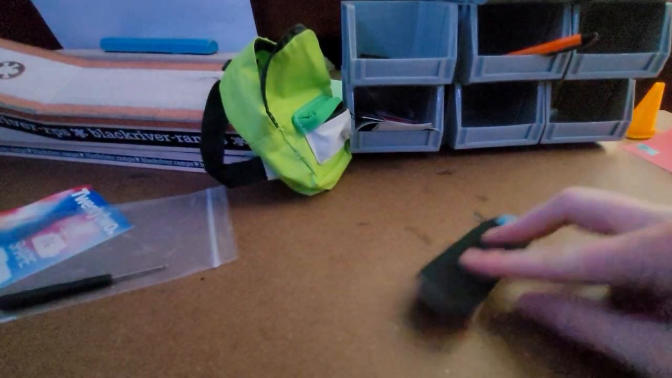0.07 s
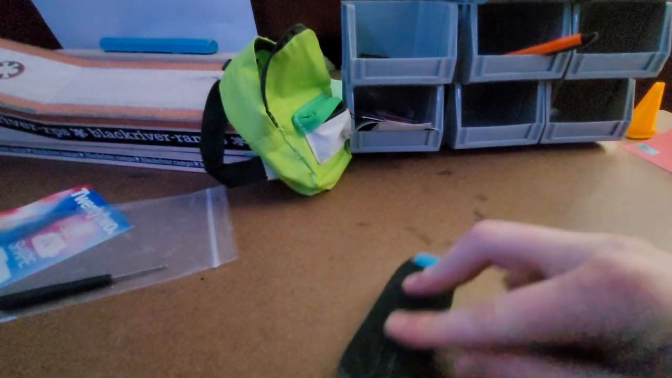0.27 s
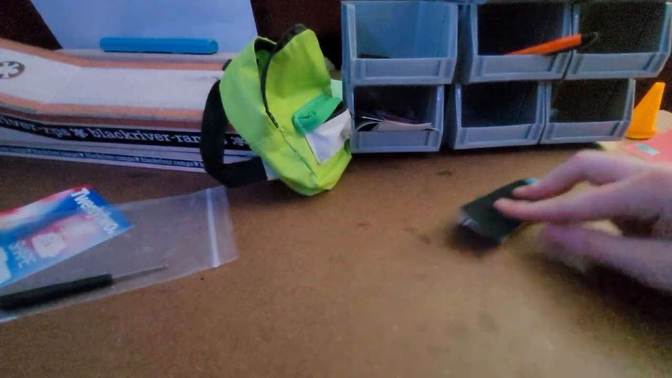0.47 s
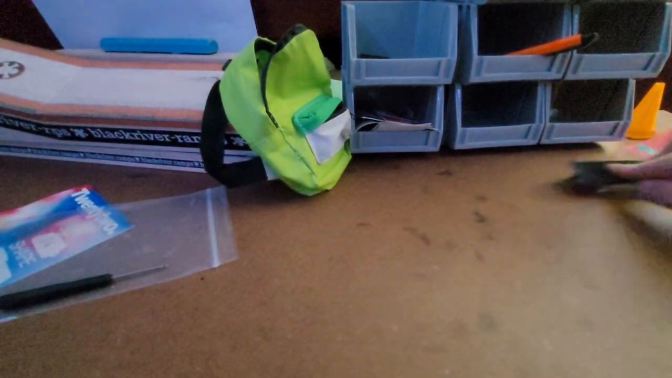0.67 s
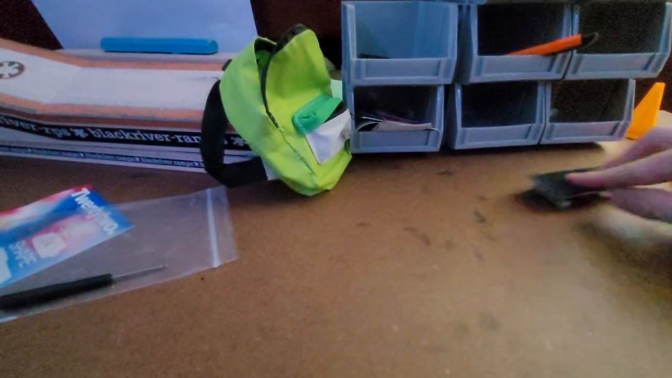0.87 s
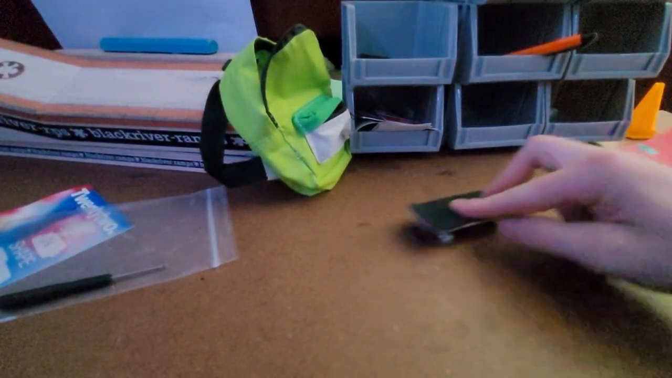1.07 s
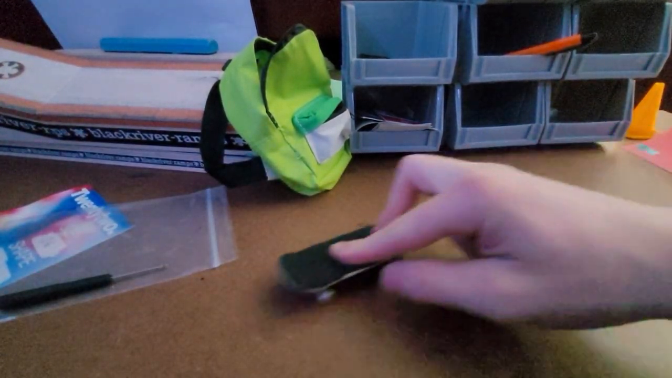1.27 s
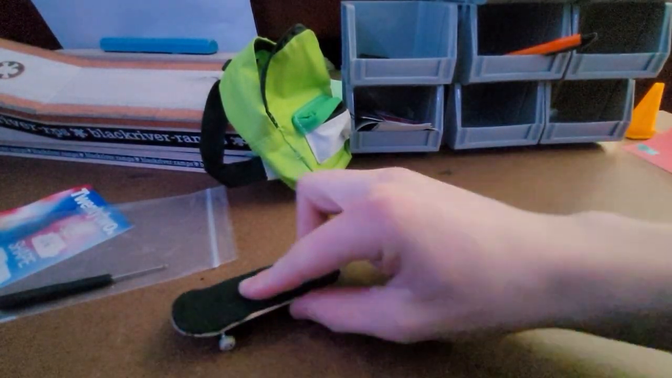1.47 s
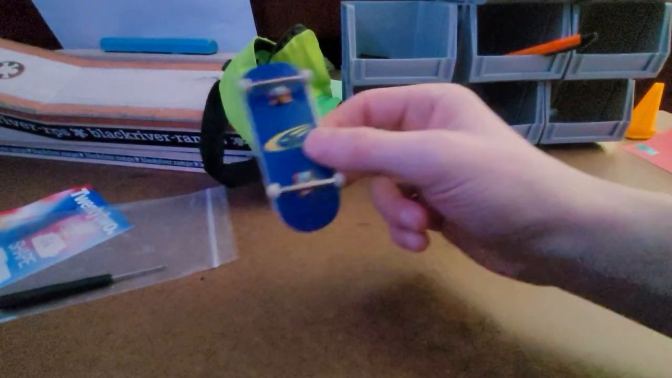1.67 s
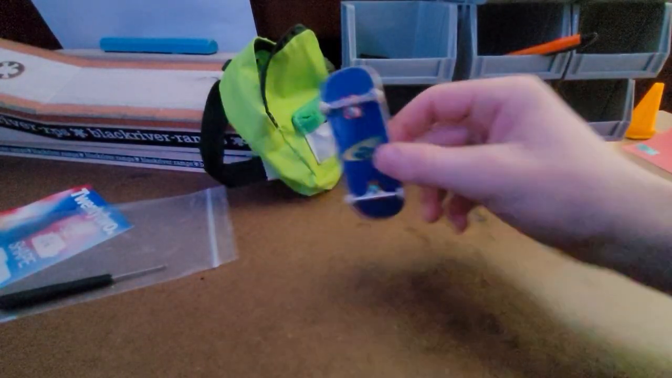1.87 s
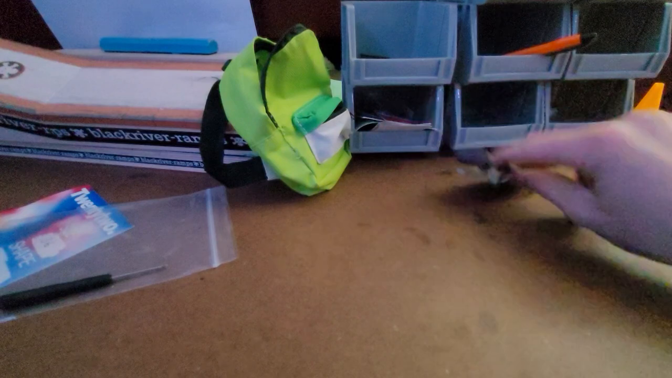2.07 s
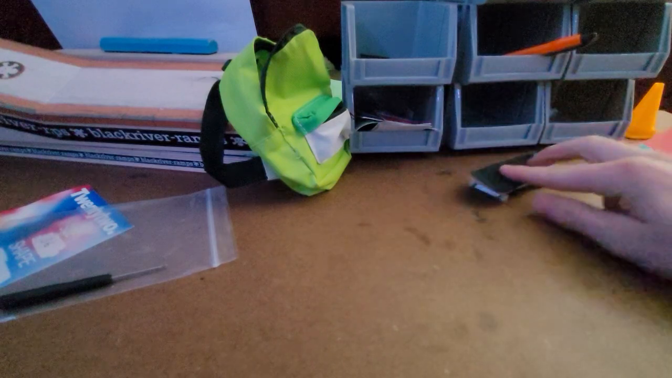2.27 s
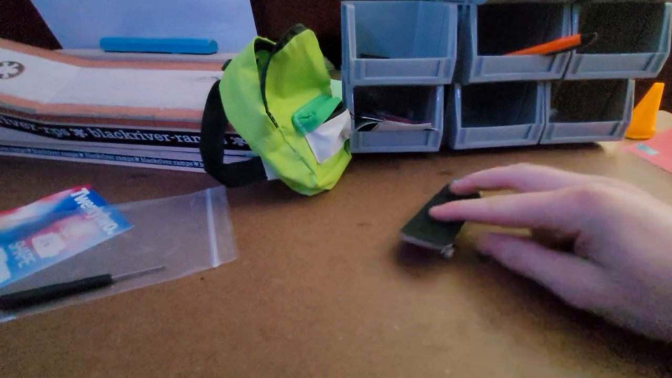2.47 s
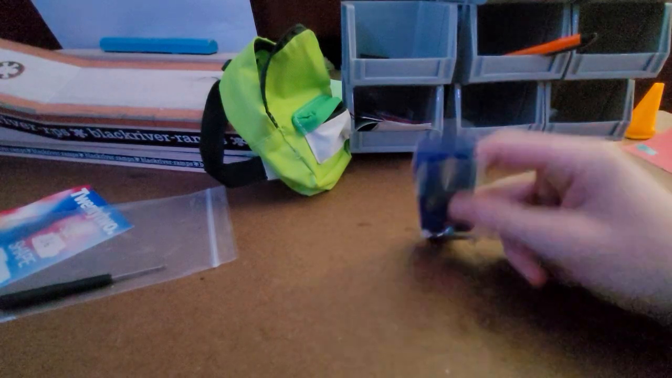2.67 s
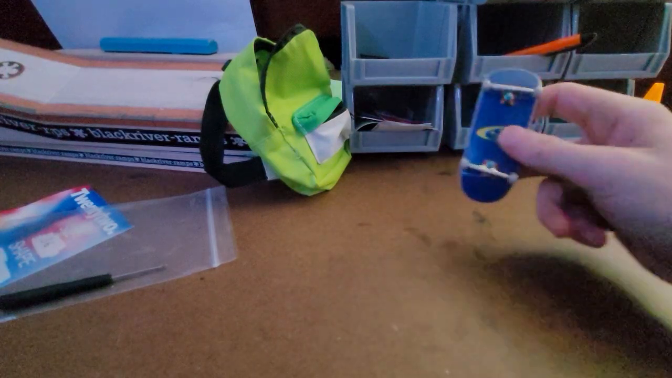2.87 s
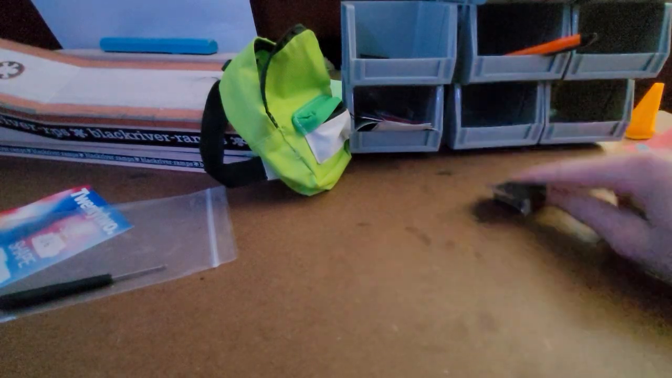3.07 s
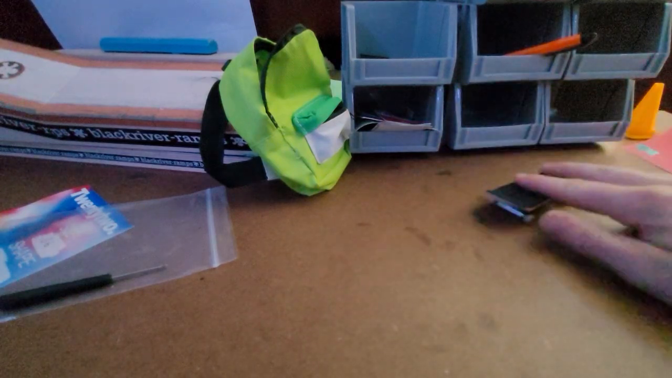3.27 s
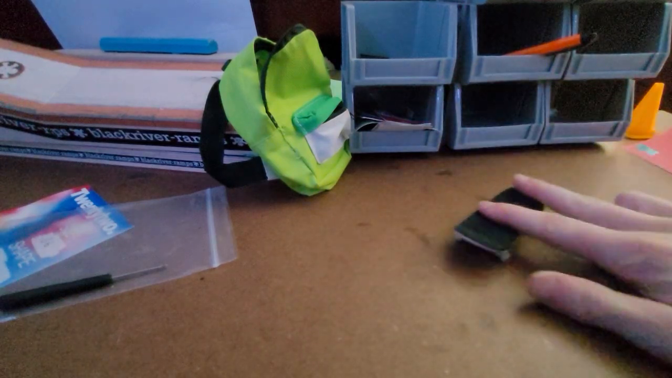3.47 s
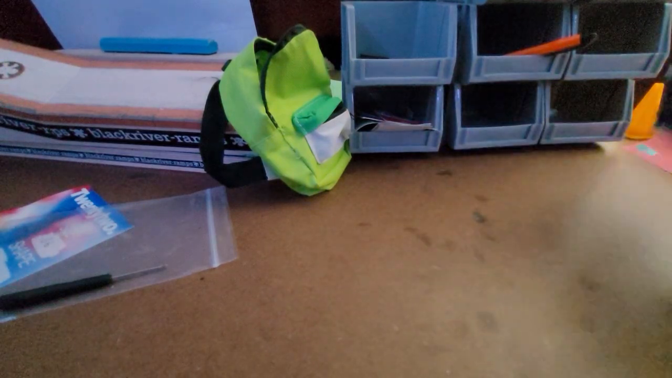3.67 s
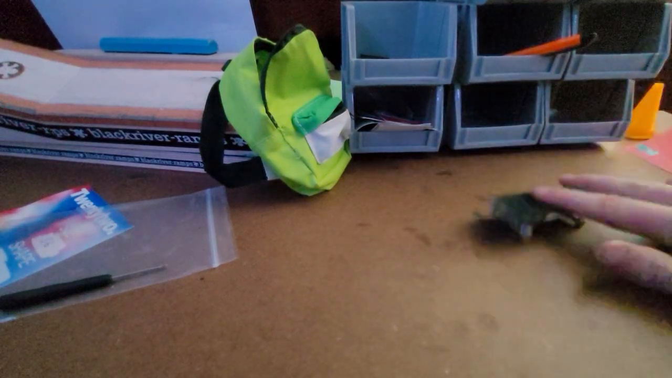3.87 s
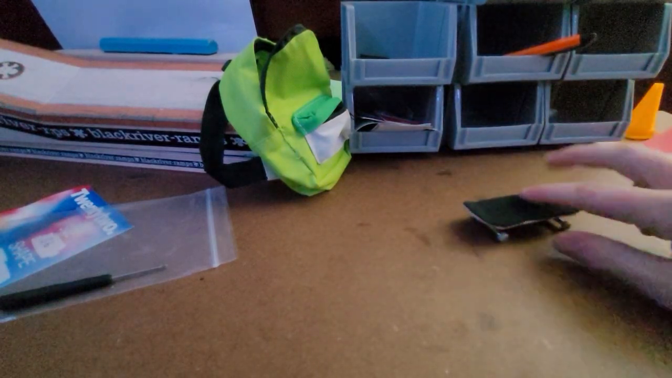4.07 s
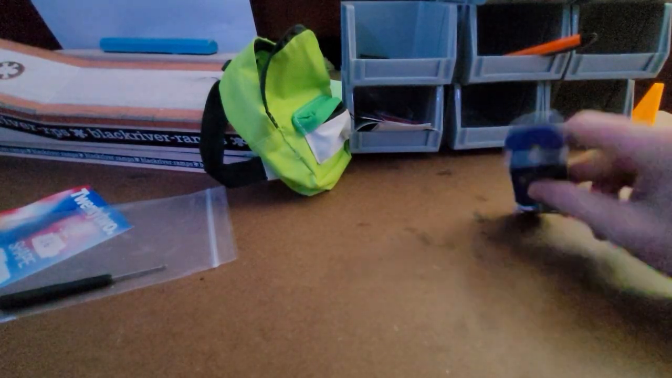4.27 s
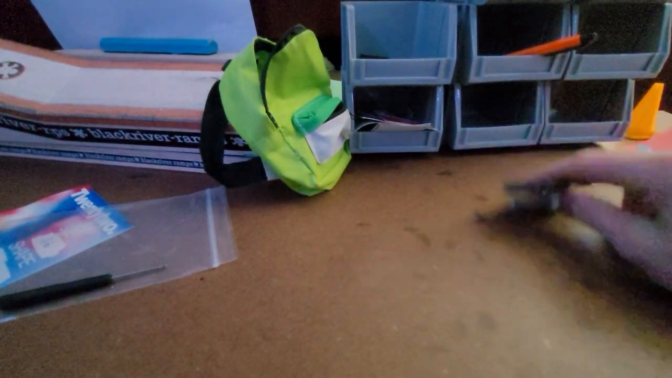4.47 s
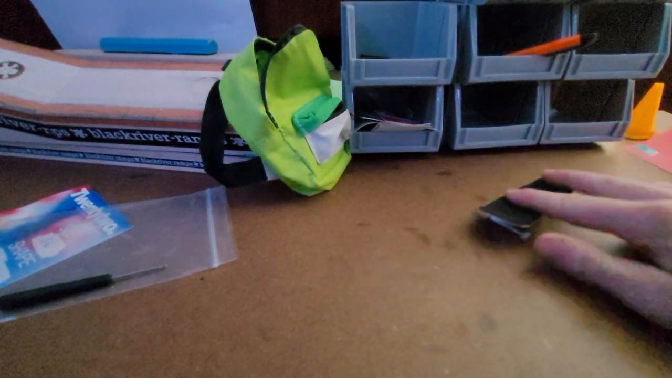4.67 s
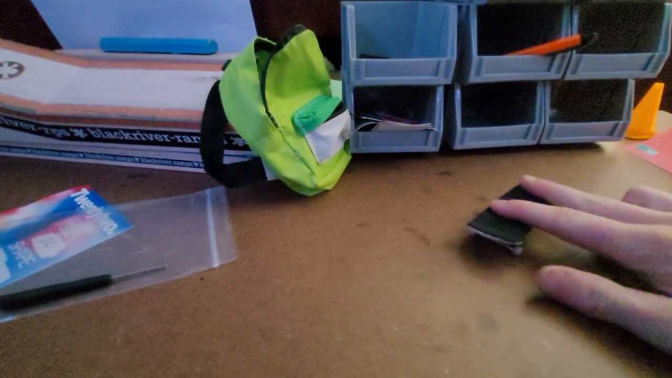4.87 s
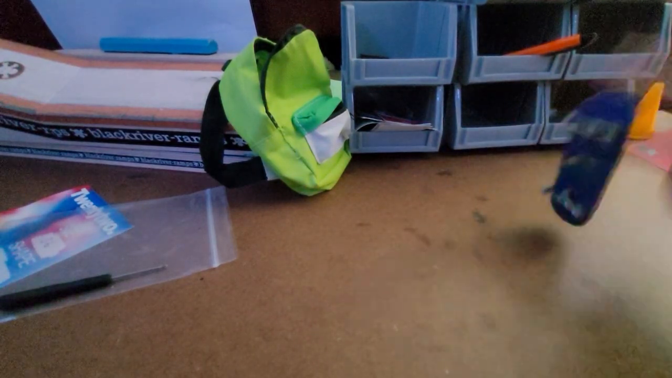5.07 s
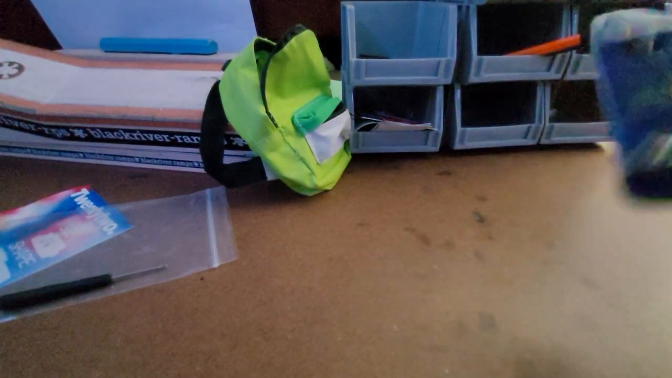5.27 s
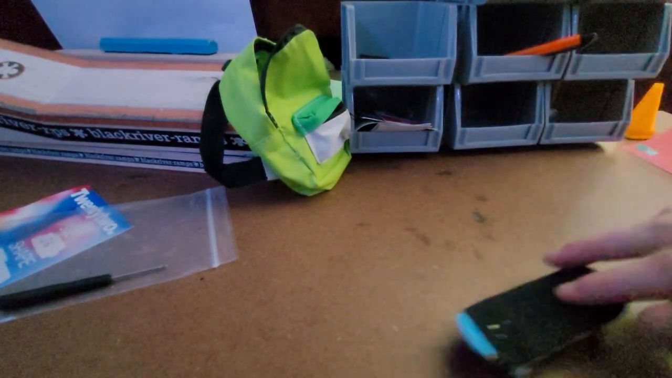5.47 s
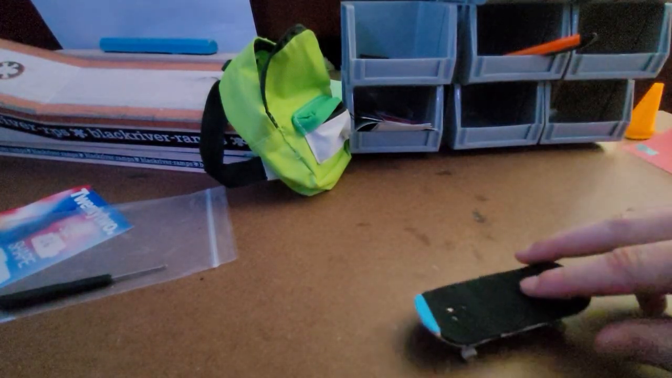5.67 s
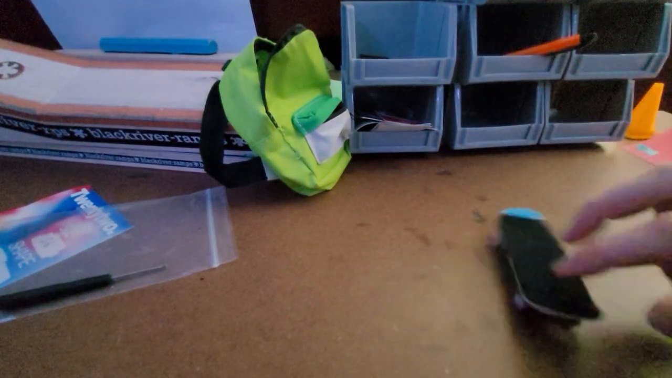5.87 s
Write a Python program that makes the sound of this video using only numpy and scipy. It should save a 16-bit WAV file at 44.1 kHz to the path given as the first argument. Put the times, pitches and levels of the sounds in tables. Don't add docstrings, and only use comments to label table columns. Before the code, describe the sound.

A toy skateboard scrapes back and forth on a desktop, its tail snapping and its wheels clattering down, with steady hum behind.

```python
import sys
import numpy as np
from scipy import signal
from scipy.fft import rfft, irfft, next_fast_len
from scipy.io import wavfile

SR = 44100
rng = np.random.default_rng(int(sys.argv[2]) if len(sys.argv) > 2 else 0)


def digitize_waveform(pressure):
    field = np.atleast_2d(pressure).T
    bounded = np.clip(field, -1, 1)
    quanta = np.round(bounded * 32767).astype(np.int16)
    wavfile.write(sys.argv[1], SR, quanta)


def ratio_of_db(decibels):
    return 10 ** (np.asarray(decibels, float) / 20)


N = 260229


def rms_one(x):
    return x / np.sqrt(np.mean(x ** 2) + 1e-20)


def at_hz(points, hz):
    table_hz, values = np.transpose(points)
    return np.interp(np.log(hz), np.log(table_hz), values)


def over_time(points):
    return np.interp(np.arange(N) / SR, *np.transpose(points))


def add_at(out, s, sound):
    out[..., round(s * SR):][..., :sound.shape[-1]] += sound


def drift(rate_hz):
    step = int(np.clip(SR / rate_hz / 64, 1, 64))
    r = np.exp(-2 * np.pi * rate_hz * step / SR)
    white = rng.standard_normal(N // step + 1002)
    slow = signal.lfilter([1], [1, -2 * r, r * r], white)[1000:]
    return np.interp(np.arange(N) / step, np.arange(len(slow)), rms_one(slow))


def resonate(x, hz, width_hz):
    r = np.exp(-np.pi * width_hz / SR)
    poles = [1, -2 * r * np.cos(2 * np.pi * hz / SR), r * r]
    return signal.lfilter([(1 - r * r) / 2, 0, (r * r - 1) / 2], poles, x)


def swell(t, start, end, rise_s, fall_s, order):
    outside = np.maximum((start - t) / rise_s, (t - end) / fall_s)
    return ratio_of_db(-20 * np.maximum(0, outside) ** order)


def fades(times, levels_db, t60, rise_s):
    out, t = np.zeros(N + SR), np.arange(SR // 5) / SR
    shape = ratio_of_db(-60 * t / t60) * (1 - np.exp(-t / rise_s))
    for s, db in zip(times, levels_db):
        add_at(out, s, ratio_of_db(db) * shape)
    return out[:N]


def pair(spectrum, likeness, balance):
    size = next_fast_len(N)
    hz = np.arange(size // 2 + 1) * SR / size + 1
    colour = ratio_of_db(at_hz(spectrum, hz)) * (hz < 15800)
    mid, side = rfft(rng.standard_normal((2, size))) * colour
    alike = np.clip(at_hz(likeness, hz), -.99, .99)
    lean = ratio_of_db(at_hz(balance, hz) / 2)
    mid, side = np.sqrt(1 + alike) * mid, np.sqrt(1 - alike) * side
    out = irfft([(mid + side) * lean, (mid - side) / lean], size)[:, :N]
    return out / np.std(out.mean(axis=0))


# (frequency [Hz], density [dB per Hz])
AIR_COLOUR = [(20, -25), (43, -17), (60, -14), (100, -13), (200, -14), (290, -13), (480, -18.5), (620, -23),
              (1400, -25), (2300, -26.5), (4500, -34.5), (8700, -46), (12500, -47), (15700, -48)]
# (frequency [Hz], left-right likeness [-1 to 1])
FAR_LIKENESS = [(60, 0.34), (180, 1), (550, 0.29), (1650, -0.19), (4970, -0.12), (15000, -0.164)]
# (frequency [Hz], left over right [dB])
FAR_BALANCE = [(60, 2.5), (8000, 0), (15000, 4)]
# (time [s], level [dB])
AIR_LEVEL = [(0, -47.5), (.4, -47), (1.5, -45), (2.1, -45.5), (3, -48.5), (5.9, -49)]
# (frequency [Hz], width [Hz], level [dB])
HUM = [(75.1, 2.1, -10.5), (152.7, 2.8, -4.5), (180.8, 1.06, -8.5), (289.3, 8.64, -9.5)]


def room_tone():
    mains_hz, mains_db, hum_db = 119.4, 0, 1.5
    common, own = rng.standard_normal((2, N))
    white = common + 0.17 * own * [[1], [-1]]
    hum = rms_one(sum(ratio_of_db(db) * rms_one(resonate(white, hz, width)) for hz, width, db in HUM))
    mains = np.sqrt(2) * np.sin(2 * np.pi * mains_hz * np.arange(N) / SR)
    mains = mains * ratio_of_db(mains_db + 0.77 * drift(2.701))
    air = pair(AIR_COLOUR, FAR_LIKENESS, FAR_BALANCE) * ratio_of_db(2.2 * drift(0.89))
    return ratio_of_db(over_time(AIR_LEVEL)) * (air + ratio_of_db(hum_db) * hum + mains)


# (frequency [Hz], left-right likeness [-1 to 1])
NEAR_LIKENESS = [(50, 0.4082), (200, 1), (700, 0.49), (1500, 0.102), (4000, 0.023), (12000, 0.036)]
# (frequency [Hz], left over right [dB])
NEAR_BALANCE = [(60, -1), (300, -3), (3000, 1.5), (6000, 0), (9000, 6.5), (15000, 11)]


def near(spectrum):
    return pair(spectrum, NEAR_LIKENESS, NEAR_BALANCE)


# (time [s], level [dB])
HAND_WEIGHT = [(0.0, -43), (1.0, -45), (1.26, -38), (1.85, -53), (2.15, -41.5), (2.89, -55.5), (3.22, -59),
               (3.48, -38.5), (3.79, -42), (4.03, -45), (4.37, -55.5), (4.78, -45.5), (4.93, -52),
               (5.42, -48), (5.9, -46)]
# (frequency [Hz], density [dB per Hz])
DRONE_COLOUR = [(40, -27.5), (70, 7), (150, -7), (270, 5), (330, -23.5), (430, 3), (560, -10.5), (800, -44)]


def drone():
    return ratio_of_db(over_time(HAND_WEIGHT) - 3.0 + 1.7 * drift(22.4)) * near(DRONE_COLOUR)


# (time [s], sway peak [dB], bounce over the sway [dB])
THUMPS = [(0.048, -38, -15), (0.344, -22.5, -4.5), (2.221, -33, 4), (2.249, -31, -1), (2.78, -25.5, -9),
          (3.221, -41, 6), (3.746, -30.5, 9.5), (3.963, -35, 10.5), (4.03, -42, 14), (4.246, -32, -5),
          (4.399, -42, 5), (4.619, -42.5, 7), (5.177, -30, 3), (5.486, -29, 9.5), (5.529, -30.5, -7.5),
          (5.603, -35, -1.5)]


def thumps():
    sway_hz, bounce_hz, t60 = 70.816, 136.4, 0.2
    out, t = np.zeros((2, N + SR)), np.arange(SR // 4) / SR
    lead = np.array([[-.6], [.6]])
    sagging_t = t + 0.005691 * (1 - np.exp(-t / 0.00684))
    sway = np.sin(2 * np.pi * sway_hz * sagging_t + lead) * ratio_of_db(-60 * t / t60)
    bounce = np.sin(2 * np.pi * bounce_hz * t + 0.64 * lead) * ratio_of_db(-60 * t / (0.72 * t60))
    for s, db, bounce_db in THUMPS:
        swings = sway + ratio_of_db(bounce_db) * bounce
        add_at(out, s, ratio_of_db(db + 3.5) * swings * (1 - np.exp(-t / 0.0031)))
    return out[:, :N] * ratio_of_db([[-2.2], [2.2]])


# (time [s], level [dB], frequency [Hz], length [s], width [Hz])
SQUEAKS = [(0.318, -36.5, 3800, 0.052, 400), (0.3, -40.5, 4600, 0.012, 400), (0.26, -38, 1700, 0.03, 400),
           (0.47, -38, 1300, 0.041, 530), (0.485, -35.5, 3260, 0.02, 980), (0.525, -40, 3400, 0.015, 500),
           (0.45, -45, 4300, 0.008, 500), (0.8, -46, 4200, 0.027, 1400), (0.92, -39, 2897, 0.018, 600),
           (0.96, -44, 4400, 0.025, 910), (1.319, -48, 1900, 0.095, 600), (2.47, -44.5, 980, 0.04, 260),
           (1.77, -50, 2200, 0.05, 600), (1.78, -51, 3100, 0.04, 600), (1.78, -58, 6500, 0.06, 1000),
           (3.205, -48, 1370, 0.02, 400), (3.51, -46.5, 2280, 0.084, 670), (4.819, -53, 2060, 0.13, 580),
           (5.108, -48.5, 2390, 0.027, 600)]


def squeaks():
    out, white = np.zeros((2, N)), rng.standard_normal((2, SR // 4))
    t = np.arange(SR // 4) / SR - 1 / 8
    for s, db, hz, length, width in SQUEAKS:
        squeak = rms_one(resonate(resonate(white, hz, width), hz, width))
        add_at(out, s - 1 / 8, ratio_of_db(db) * np.exp(-(t / length) ** 2) * squeak)
    return out * ratio_of_db(2.6 * drift(85.26))


# (start [s], length [s], load at the start [dB], load at the end [dB])
PASSES = [
    (0.0, 0.33, -42.5, -41.5),
    (0.433, 0.38, -43, -38),
    (0.936, 0.4127, -39, -39),
    (1.367, 0.22, -39.5, -48),
    (1.704, 0.49, -59.5, -55),
    (3.42, 0.14, -47.5, -44),
    (4.72, 0.1709, -53, -56),
    (5.698, 0.21, -52, -50),
]
# (peak [s], rise [s per 20 dB], fall [s per 20 dB], level [dB], grit over it [dB])
SKIDS = [(0.27, 0.18, 0.14, -40.5, -11.5), (0.45, 0.15, 0.07, -49, -10), (0.5, 0.13, 0.11, -39, -8.5),
         (0.77, 0.46, 0.04, -48, -2), (0.95, 0.08, 0.37, -45.5, -7), (1.671, 0.04, 0.01, -42.5, -12),
         (1.8, 1, 0.5, -53.5, -10.5), (2.52, 0.18, 0.1693, -44.5, -8.5), (2.767, 0.1, 0.08, -52, -6),
         (3.5, 0.63, 0.35, -56.5, -1), (3.72, 0.1148, 0.08, -36.5, -4.5), (4.33, 0.15, 0.1, -62, 2),
         (4.83, 0.2, 0.1, -63.5, -2), (5.13, 0.13, 0.3, -52.5, -5.5), (5.91, 0.06, 0.1, -47, -9)]
# (frequency [Hz], density [dB per Hz])
RUMBLE = [(200, -10), (300, -3), (430, 1.5), (600, -1.5), (1000, -3), (1640, -6), (1900, -15), (2800, -50)]
WHEEL = [(650, -27), (1100, 4.5), (1390, 0.5), (1740, 2), (2400, 0.5), (2530, 1.5), (3600, -13.5),
         (4680, -43.5), (7920, -120)]
AXLE = [(1530, -54), (2600, -5), (3170, -2.5), (3480, -5.5), (3770, -2.5), (5520, -7.5), (6120, -10.5),
        (7500, -17), (9750, -35), (16500, -120)]
GRIT = [(3410, -26.5), (5800, -5), (7030, 1.5), (8710, -7), (9850, -2.5), (13600, -3), (15100, -8.5),
        (16200, 3), (16500, -53)]


def rolling():
    touch_s, lift_s = 0.025, 0.08
    parts_over_load = ratio_of_db([[0], [-13], [-12], [-17]])
    t = np.arange(0, N / SR + .002, .001)
    power = np.zeros((4, len(t)))
    for s, length, first_db, last_db in PASSES:
        load = ratio_of_db(np.interp(t, [s, s + length], [first_db, last_db]))
        load = load * swell(t, s, s + length, touch_s, lift_s, order=1)
        power += (load * parts_over_load) ** 2
    for s, rise_s, fall_s, db, grit_db in SKIDS:
        parts = ratio_of_db([[db - 3.5], [db], [db - 4], [db + grit_db]])
        power += (swell(t, s, s, rise_s, fall_s, order=2) * parts) ** 2
    bumps = drift(61.5) + 0.57 * drift(178) + 0.55 * drift(21)
    out = np.zeros((2, N))
    for level, colour, rough_db in zip(np.sqrt(power), (RUMBLE, WHEEL, AXLE, GRIT), (1.03, 0.86, 1.0, 0.57)):
        out += np.interp(np.arange(N) / SR, t, level) * ratio_of_db(rough_db * bumps) * near(colour)
    return out


PATCH_EDGES = (700, 1300, 2200, 3600, 6000)


def patchy(x):
    patch_db, grain_db = 1.0, 1.5
    size = next_fast_len(N)
    whole = rfft(x, size)
    band = np.searchsorted(PATCH_EDGES, np.arange(size // 2 + 1) * SR / size)
    out = np.zeros((2, N))
    for k in range(len(PATCH_EDGES) + 1):
        gain = ratio_of_db(patch_db * drift(9.6) + grain_db * drift(77))
        out += irfft(whole * (band == k), size)[:, :N] * gain
    return out


# (time [s], crack peak [dB], then over the crack: sizzle [dB], low boom [dB], high boom [dB])
TAPS = [(0.3093, -29.5, -22.5, -4.5, -21), (0.3755, -27.5, -16, -21, -10), (1.668, -29, -11.5, -35, -22.5),
        (1.7161, -30.5, -24, -7, -11.5), (2.431, -32.5, -1.5, -10.5, -24), (2.6112, -35, -16, -18, -9.5),
        (2.715, -38, -16, -6, -16), (2.7598, -28.5, -19, -8, -6), (2.787, -12.5, -9, -15.5, -15.5),
        (3.1547, -22, -4.5, -18, -22), (3.2155, -24.5, 0, 1, -9), (3.3903, -26, -5.5, -3.5, -9.5),
        (3.7426, -13, -9, -11.5, -1), (4.0285, -20, -6.5, -2.5, -4.5), (4.2512, -44, -9, 10.5, 1.5),
        (4.4032, -23, -14, -3, -8), (4.5294, -58, 0.5, -8.5, -8), (4.58, -21, -5.5, -7, -9),
        (4.627, -16.5, -5, -17, -12.5), (4.6508, -30, -18.5, -7, -16), (4.6793, -33, 0, 5, -6),
        (5.1728, -12.5, -4, -17.5, -8.5), (5.1813, -18.5, -10, -7.5, -3)]
LANDINGS = [(2.1959, -15, -4, -13, -44.5), (2.206, -30, -20, 10, -17), (2.2176, -16.5, -2.5, -0.5, -11),
            (2.2364, -26, -10.5, -3.5, -4), (2.2486, -18, -18, -6, -5), (2.2569, -25.5, -6.5, -9, 0.5),
            (3.9594, -20.5, -8.5, -20, -14), (3.9647, -17, -11, -5, -6), (3.9727, -22.5, -7, 1.5, 2),
            (3.9837, -22, -14.5, 3, -1), (5.485, -7, -16, -3, -7), (5.4999, -22, -14, -4, 0),
            (5.522, -15.5, -8, -9.5, -16.5), (5.525, -13, -6.5, -13, -8.5), (5.5337, -20, -10, -1, -2.5),
            (5.5416, -16, -5, -4, -6), (5.594, -33, -17, -11, -13.5), (5.6019, -20, -1.5, -6, -6),
            (5.607, -18, -2, -6, -8.5), (5.6145, -14, -11, -11, -15)]
REBOUNDS = [
    (0.2886, -31, -17, -13, -4),
    (0.4432, -32, -12, -20, -15),
    (0.9487, -37, -14, -20, -15),
    (1.6536, -38, -18, -20, -15),
    (3.146, -53, -8, 21, 9),
    (4.585, -29, -8, -4, -8),
    (4.591, -32, -12, 0.5, -3),
    (4.634, -26.5, -10, -8, -9),
]
# (time [s], level [dB])
CHATTERS = [(2.2163, -32), (2.2362, -27), (2.2487, -22), (2.7598, -36), (2.7871, -30.5), (3.1546, -35.5),
            (3.2156, -39), (3.7425, -26.5), (3.9591, -28), (3.9727, -26.5), (3.9834, -25.5),
            (4.0284, -31.5), (4.58, -37), (4.627, -31.5), (4.6508, -42), (5.1728, -45), (5.1813, -45),
            (2.1959, -47.5), (5.485, -33), (5.5001, -26), (5.5416, -25), (5.6019, -32.5)]


def blows():
    s, db, *others = np.transpose(sorted(TAPS + LANDINGS) + REBOUNDS)
    chatter_db = np.full(len(s), -25.5)
    for loose_s, loose_db in CHATTERS:
        k = np.argmin(np.abs(s - loose_s))
        chatter_db[k] = loose_db - db[k]
    return s, db, *others, chatter_db


# (time [s], peak [dB], frequency [Hz], t60 [s])
HOLLOWS = [(2.2188, -19, 360, .05), (2.2468, -14, 266, 0.04), (2.2657, -27, 330, .06),
           (2.787, -19.5, 554, .05), (3.2165, -23.5, 380, 0.064), (3.745, -13, 560, .05),
           (4.031, -26, 400, .04), (4.404, -28, 505, .04), (4.586, -31, 300, .05), (4.628, -27, 564, 0.034),
           (4.68, -31, 330, .05), (5.174, -26.5, 872, 0.061), (5.1815, -26, 556, .05),
           (5.4868, -9, 500, .012), (5.6115, -15, 300, .03), (5.608, -19, 538, 0.053)]


def hollows():
    out, t = np.zeros(N + SR), np.arange(SR // 6) / SR
    for s, db, hz, t60 in HOLLOWS:
        envelope = ratio_of_db(db - 60 * t / t60) * (1 - np.exp(-t / 0.00084))
        add_at(out, s, envelope * np.sin(2 * np.pi * hz * t))
    return out[:N]


# (frequency [Hz], level [dB], t60 [s])
DESK_LOW = [(245, -3.5, 0.031), (272.7, 2, 0.07655), (283.6, 1, 0.061)]
DESK_HIGH = [(377, -3, 0.088), (437, -4.5, 0.076), (479, -6, 0.089), (563, 0.5, 0.035),
             (646.3, -6.5, 0.081), (846, -18.5, 0.066)]
PLY_KNOCK = [(1263, -17, 0.031), (1366, -19, 0.047), (1700, -15.5, 0.033), (2080, -13, 0.047),
             (2400, -23, 0.12)]


def desk():
    s, db, _, low_db, high_db, _ = blows()
    at, out = np.round(s * SR).astype(int), np.zeros((2, N))
    modes = [(mode, low_db) for mode in DESK_LOW]
    modes += [(mode, high_db) for mode in DESK_HIGH]
    modes += [(mode, 0) for mode in PLY_KNOCK]
    for (hz, mode_db, t60), boom_db in modes:
        luck, delay, lean = rng.standard_normal((3, len(s)))
        strength = ratio_of_db(db + boom_db + mode_db + 2.2 * luck) * np.sign(delay)
        late = np.round(np.abs(delay) * 0.00119 * SR).astype(int)
        pushes = np.full((2, N), 1e-18)
        pushes[:, at + late] = strength * (1 + hz / 1500 * lean * [[1], [-1]])
        r, w = ratio_of_db(-60 / (t60 * SR)), 2 * np.pi * hz / SR
        out += signal.lfilter([0, np.sin(w)], [1, -2 * r * np.cos(w), r * r], pushes)
    soft_contact = signal.butter(1, 1200, fs=SR, output="sos")
    return signal.sosfilt(soft_contact, out)


# (time [s], peak [dB], low note [Hz], high note [Hz], high note over the low [dB])
NOTES = [(1.6671, -22, 1560, 3074, -2.5), (2.1964, -14.5, 1600, 3270, -2), (2.2182, -18, 1700, 5087, 5),
         (2.2486, -22, 1880, 4240, 5), (2.787, -20.5, 2065, 4600, 4), (3.1561, -13.5, 1767, 5060, -7),
         (3.2154, -31, 2029, 4230, 16), (3.3902, -19.5, 2080, 4120, -10), (3.7419, -15.5, 2040, 4520, -9),
         (3.963, -38, 2560, 4886, 2), (4.0296, -21.5, 2170, 4480, 9.5), (4.2627, -33, 2179, 4170, -11),
         (4.355, -31.5, 1623, 3580, -15), (4.4039, -16.5, 1837, 3660, -8), (4.5798, -17, 1600, 4595, -20.5),
         (4.5855, -19, 2250, 4440, -12), (4.6269, -17, 2330, 4060, -13), (5.172, -28, 2311, 4650, -6.5),
         (5.4858, -5, 1450, 4100, -15), (5.5244, -12.5, 1880, 4131, -17), (5.5942, -28.5, 1681, 3544, 1),
         (5.6056, -12.5, 1620, 3570, 1.5)]
NOTE_SPREAD = (.88, .97, 1.05, 1.16)


def notes():
    out, t = np.zeros((2, N + SR)), np.arange(SR // 6) / SR
    attack = 1 - np.exp(-t / 0.00019)
    for s, db, low_hz, high_hz, high_db in NOTES:
        for hz, level_db, t60 in ((low_hz, db - 11.5, 0.036), (high_hz, db + high_db - 13.5, 0.028)):
            turns = rng.random((len(NOTE_SPREAD), 2, 1))
            tones = sum(np.sin(2 * np.pi * (hz * detune * t + turn)) for detune, turn in zip(NOTE_SPREAD, turns))
            add_at(out, s, ratio_of_db(level_db - 60 * t / t60) * attack * tones)
    return out[:, :N]


# (time [s], level [dB], t60 [s], ring over the crack [dB])
POPS = [
    (3.7419, -15, 0.2, -17),
    (5.172, -9.5, 0.15, -15),
]
# (frequency [Hz], width [Hz], level [dB])
DECK = [(2200, 700, 0), (4400, 900, 0), (6900, 1000, 1), (9700, 1000, -7), (12200, 1600, -8),
        (15200, 1000, -11)]


def deck():
    out, t = np.zeros((2, N)), np.arange(SR // 4) / SR
    for s, db, t60, ring_db in POPS:
        white = rng.standard_normal((2, len(t)))
        bands = sum(ratio_of_db(level_db) * resonate(resonate(white, hz, width), hz, width) for hz, width, level_db in DECK)
        ring = ratio_of_db(db + ring_db - 60 * t / t60)
        snap = ratio_of_db(db - 2.5 - 60 * t / 0.0082)
        add_at(out, s + .001, (ring + snap) * rms_one(bands) * ratio_of_db([[2.1], [-2.1]]))
    return out * ratio_of_db(3.4 * drift(180.0))


# (frequency [Hz], density [dB per Hz])
CRACK = [(410, -8.5), (700, -3.5), (1100, -8), (1440, -6), (1700, -6.5), (3690, -7), (4000, -6.5),
         (5890, -10.5), (8000, -11), (10400, -50), (17600, -120)]
SIZZLE = [(3530, -48), (6000, -5), (6770, -7), (8920, -5.5), (12100, 0), (14000, -3.5), (16200, -5.5),
          (16800, -70)]


def cracks():
    s, db, sizzle_db, _, _, chatter_db = blows()
    lumps, splinters = ratio_of_db(2.4 * drift(270)), ratio_of_db(4.04 * drift(1050))

    def shape(level_db):
        burst = fades(s + 0.0005, level_db - 2, t60=0.014, rise_s=0.00004)
        chatter = fades(s, level_db + chatter_db, t60=0.15, rise_s=0.0012)
        return splinters * burst + lumps * chatter

    plain = near(CRACK)
    body = plain + 0.53 * sum(resonate(plain, hz, width) for hz, width, _ in DECK[:3])
    return shape(db - 3.5) * rms_one(body) + shape(db + sizzle_db + 4.0) * near(SIZZLE)


def room(x):
    t60, level_db = 0.21, -13
    t = np.arange(SR // 3) / SR
    tail = rng.standard_normal((2, len(t))) * ratio_of_db(-60 * t / t60) * (t > .003)
    tail = signal.lfilter([1], [1, -.55], tail)
    tail = tail / np.sqrt(np.sum(tail ** 2, axis=1, keepdims=True))
    return ratio_of_db(level_db) * signal.fftconvolve(x, tail, axes=1)[:, :N]


def scene():
    background = room_tone() + drone()
    moving = thumps() + squeaks() + patchy(rolling())
    struck = hollows() + desk() + notes() + deck() + cracks()
    return background + moving + struck + room(struck)


def band_limit(x):
    return signal.sosfilt(signal.butter(12, 16990, fs=SR, output="sos"), x)


def record(dry):
    low_cut = signal.butter(2, 39, "high", fs=SR, output="sos")
    top_cut = signal.cheby2(10, 60, 17500, fs=SR, output="sos")
    rounded = 1.217 * np.tanh(signal.sosfilt(low_cut, dry) / 1.395)
    mix = signal.sosfilt(top_cut, rounded)
    return band_limit(mix)


dry = scene()
out = record(dry)
digitize_waveform(out)
```